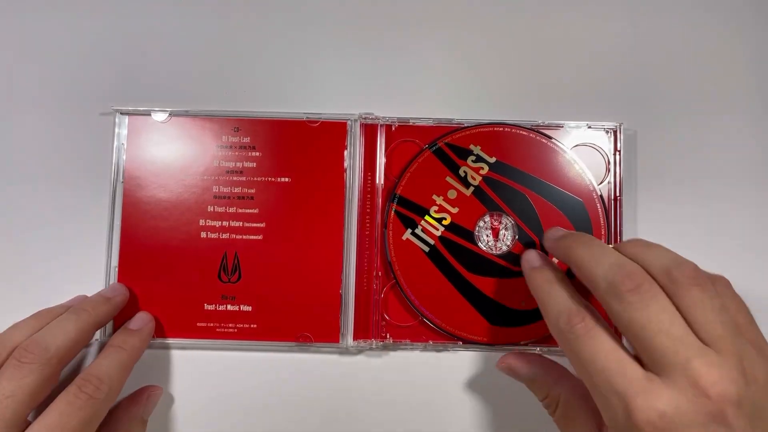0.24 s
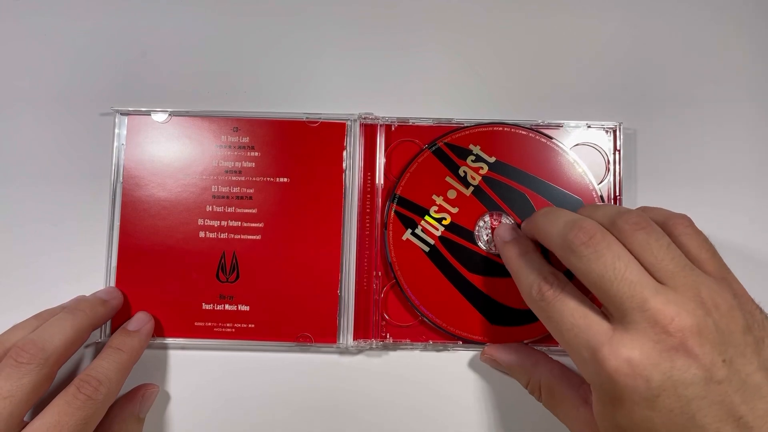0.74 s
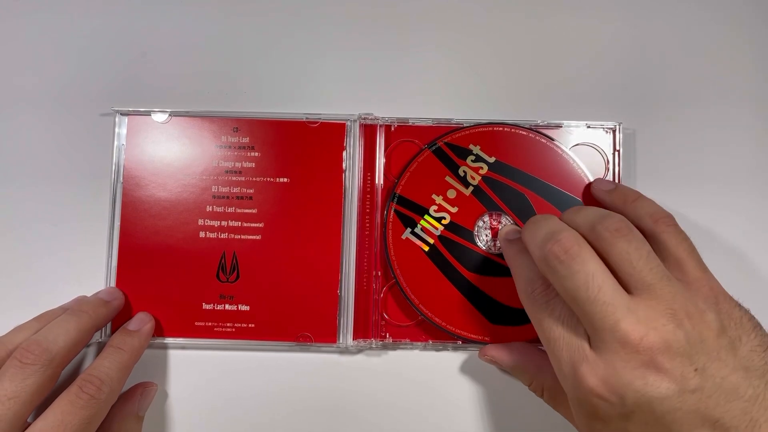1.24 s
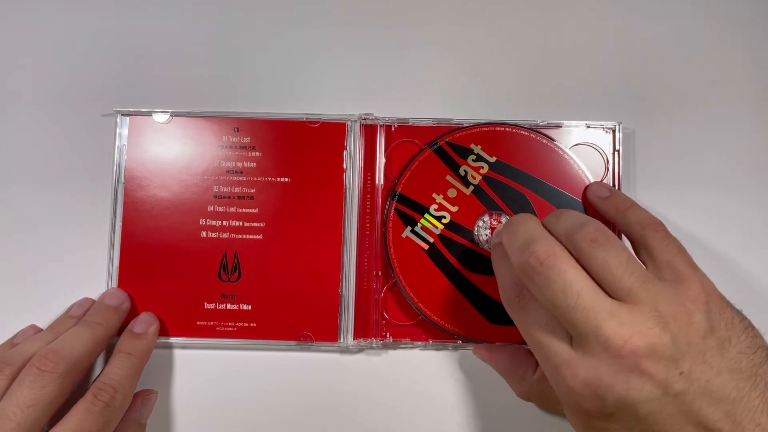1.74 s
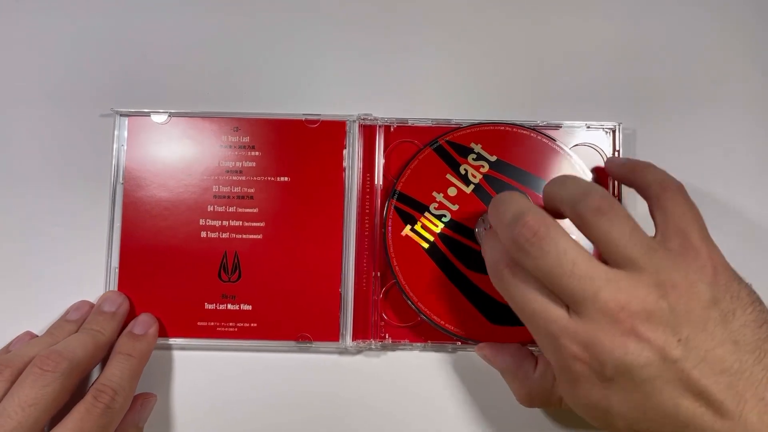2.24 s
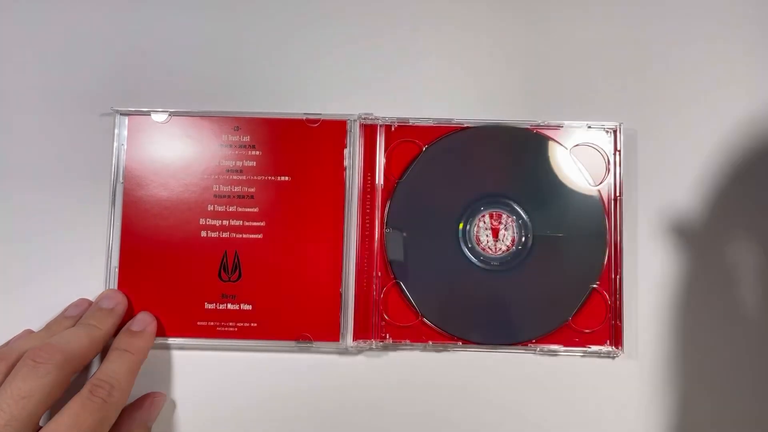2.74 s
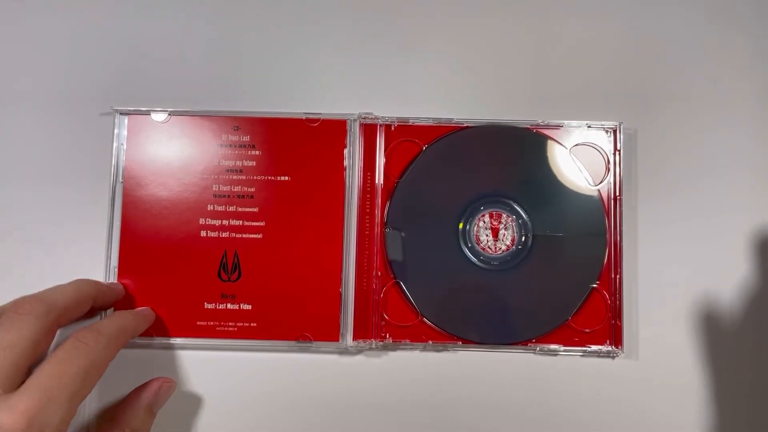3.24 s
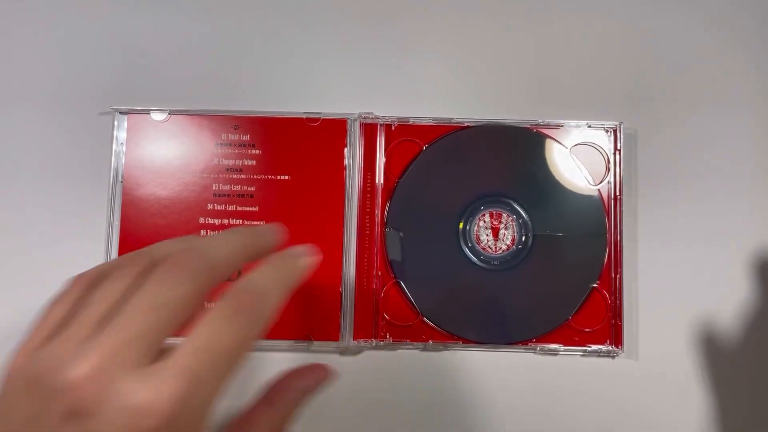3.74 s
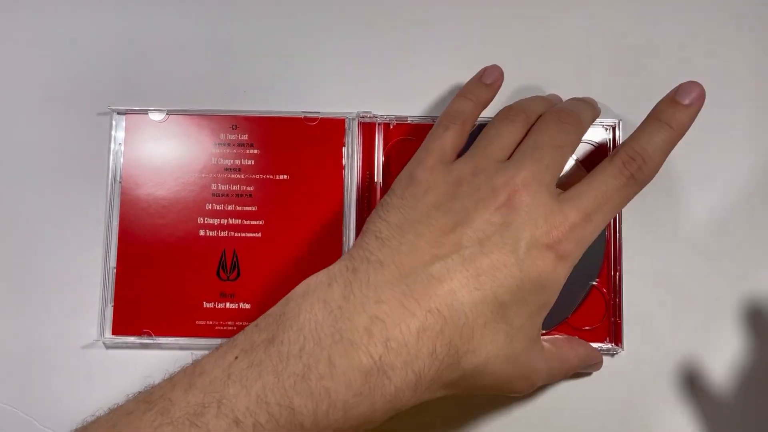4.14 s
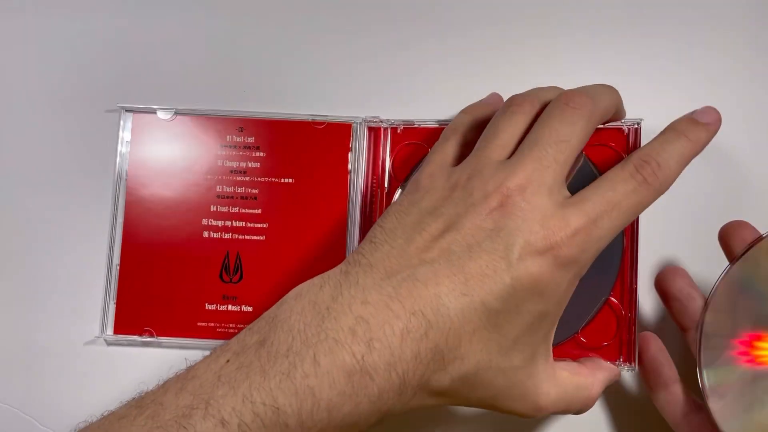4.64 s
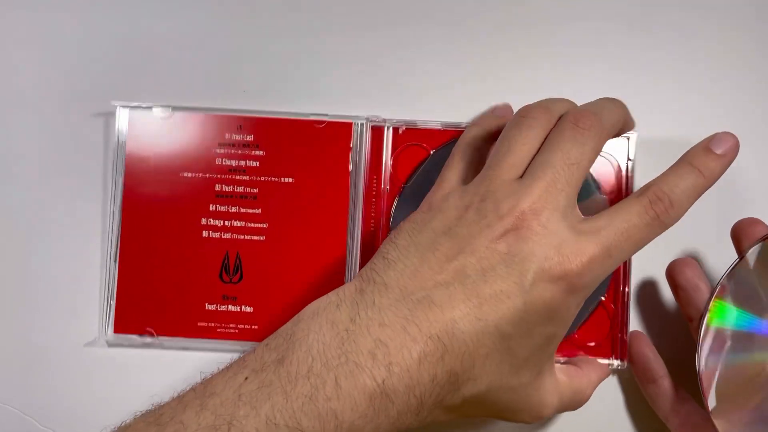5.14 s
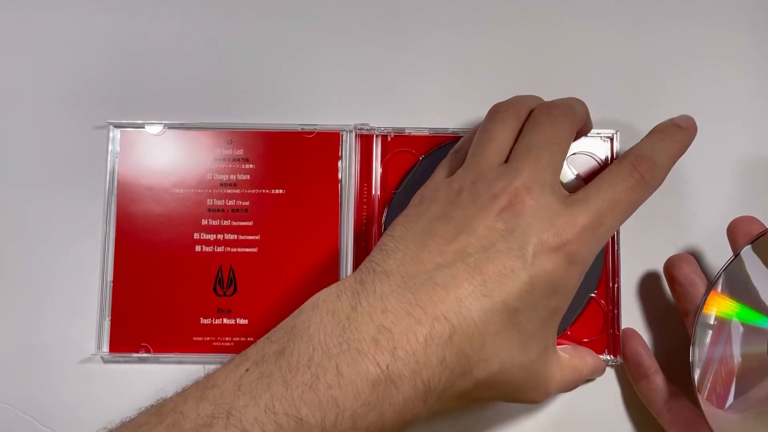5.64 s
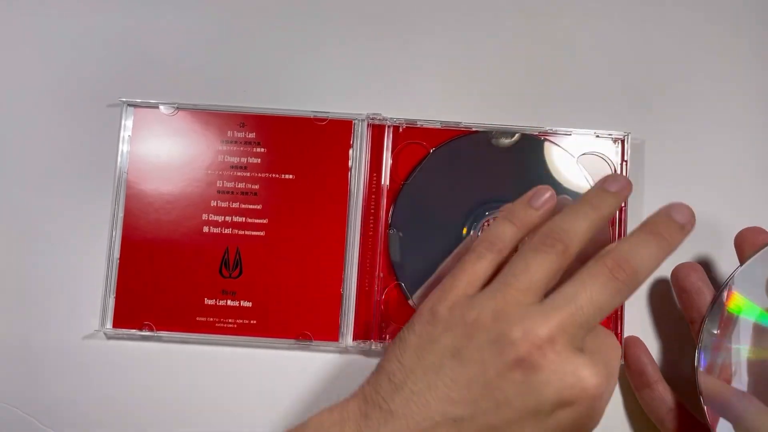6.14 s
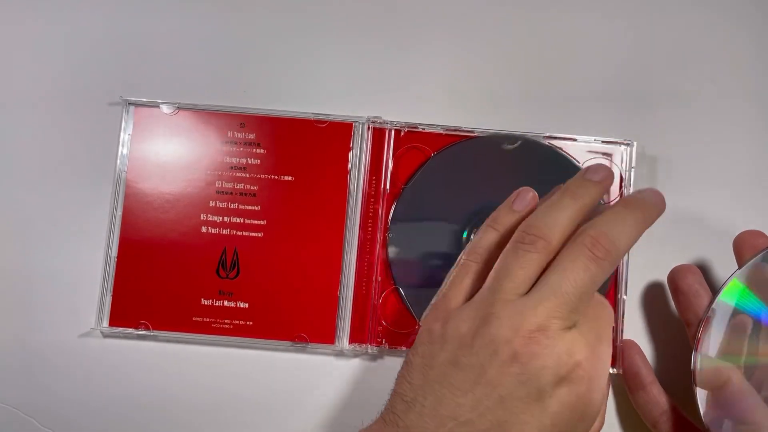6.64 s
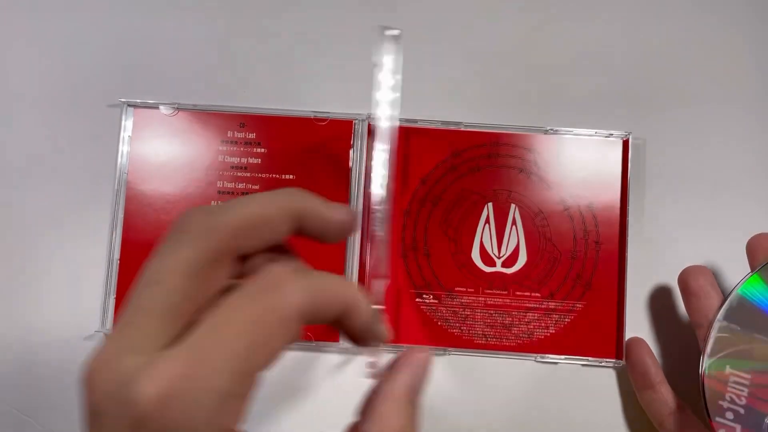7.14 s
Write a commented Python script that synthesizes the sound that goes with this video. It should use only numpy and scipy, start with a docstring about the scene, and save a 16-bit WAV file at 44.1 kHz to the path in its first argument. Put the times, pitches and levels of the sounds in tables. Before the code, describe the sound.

Fingers tick on a plastic disc case, a disc snaps off its hub with a ping, then a tray pries loose with a loud crack.

```python
"""Disc case on a table

A small quiet room, one microphone close to an open plastic disc case lying on a table.
Hands tap, tick, slide and squeak on the plastic: shaped noise bursts through the colour of each spot.
Near 2.1 s a disc snaps off its hub and pings; near 5.2 s the hinged tray is prised loose with a loud crack.
Decaying sines sound case, disc and table; near walls reflect the contacts over room air and a faint fan."""
import sys
import numpy as np
from scipy import signal
from scipy.fft import rfft, irfft
from scipy.io import wavfile
from scipy.ndimage import uniform_filter1d

SR = 44100
rng = np.random.default_rng(int(sys.argv[2]) if len(sys.argv) > 2 else 0)


def unload_audio(sound):
    """Save the sound as a 16-bit wav file, at the path given as the first command line argument."""
    columns = np.transpose(np.atleast_2d(sound))
    # keep every value between -1 and 1, then stretch to whole-number steps
    steps = np.round(np.clip(columns, -1, 1) * 32767)
    wavfile.write(sys.argv[1], SR, steps.astype(np.int16))


N = 325458  # length [samples]

# Contact levels below hold before the colour of the plastic, the spot and the room.
# room air and draughts: (frequency [Hz], density [dB per Hz])
AIR_SPECTRUM = [(1, -41), (5, -45.5), (16, -58), (25, -56), (35, -69.5), (50, -79.5), (100, -84.5),
                (160, -85.5), (220, -92.5), (330, -95.5), (600, -101.5), (1000, -105), (2000, -113),
                (4000, -115), (10000, -116), (13000, -120), (16000, -125)]
# swell of the deep rumble, used relative to its mean: (time [s], level [dB])
RUMBLE_SWELL = [(0.0, -57.5), (0.9, -48.5), (1.17, -60), (1.31, -44), (3.55, -53.5), (3.64, -43),
                (5.14, -51), (5.18, -37.5), (5.88, -52), (6.19, -44.5), (7.36, -47), (7.38, -44.5)]
# a distant fan: (frequency [Hz], level [dB])
FAN_HUM = [(150.7, -66.5), (183, -80), (242, -73)]
# centres of bass, middle, presence and treble: (frequency [Hz])
BANDS_HZ = [330, 1100, 3500, 8500]
# colour common to all contacts: (frequency [Hz], gain [dB])
PLASTIC_COLOUR = [(40, -19), (100, -1.5), (170, -2), (260, -3.5), (380, -4.5), (520, -0.5), (720, -1),
                  (1700, -4.5), (2300, -6), (4000, -1.5), (7000, -3), (8900, -1), (11500, -6), (13000, -12),
                  (15500, -19.5)]
# fingers and plastic sliding:
# (start [s], end [s], level [dB], brightness [dB per octave], favoured by the spot [Hz])
RUBS = [(0, 0.052, -61.5, 5.5, 5240), (0.843, 0.872, -54, -2, 4280), (0.992, 1.045, -58, -1, 4450),
        (1.593, 1.828, -62, -4, 9100), (2.161, 2.18, -46.5, -0.5, 8750), (2.228, 2.34, -49, -4, 734),
        (2.341, 2.378, -55, -2.5, 8700), (3.744, 4, -69, 0, 10020), (4.048, 4.157, -46, -0.9, 7900),
        (4.145, 4.229, -58, -2, 8750), (4.376, 4.484, -50, -2.2, 580), (4.81, 4.89, -60.5, -4, 7970),
        (5.075, 5.121, -53.5, -4.5, 8600), (5.134, 5.177, -31.5, -0.5, 1650), (5.336, 5.391, -52, -3, 8300),
        (5.423, 5.55, -58, -3.5, 9400), (5.694, 5.867, -55, -3, 9300), (5.849, 5.976, -50.5, -2.5, 6060),
        (6.04, 6.082, -54.5, -1.5, 4720), (6.137, 6.207, -46.5, -3, 6500), (6.212, 6.231, -49, -4, 4400),
        (6.245, 6.368, -51.5, -5, 8600), (6.588, 6.644, -49, -5.5, 730), (6.626, 6.665, -38.5, -4, 940),
        (6.658, 6.696, -35.5, -4, 1550), (6.68, 6.907, -57, -1.5, 686), (7.0, 7.254, -71, 0.5, 9750)]
# fingertips feel for a grip: (start [s], end [s])
FIDGETS = [(.1, 2), (1.7, 3.6), (5.7, 6.35)]
# dull knocks of fingertips and tray: (time [s], energy [dB], favoured by the spot [Hz])
KNOCKS = [(.291, -19.5, 640), (.5327, -22.5, 500), (1.6267, -18.5, 1190), (2.0886, 6.5, 1030),
          (3.772, -21.5, 1150), (4.0625, -14, 970), (5.7272, -12, 966), (6.0641, -12.5, 685),
          (6.1625, -9.5, 700), (6.5535, 3, 1415), (6.555, 4.5, 690), (6.61, -5.5, 700),
          (6.7439, -7.5, 1500)]
# a soft fingertip gives little treble: one value per band (gain [dB])
KNOCK_COLOUR = [0, 0.5, -21, -21]
# low booms of the case against the table top: (time [s], frequency [Hz], level [dB])
THUMPS = [(0.859, 117, -43.5), (1.635, 119.2, -45.5), (2.087, 112, -35), (4.067, 118, -45),
          (4.536, 115.3, -43.5), (5.205, 99.5, -22.5), (5.43, 108, -41), (6.362, 113.7, -37),
          (6.641, 134.2, -33), (6.673, 111, -33)]
# the tray springs back as the disc leaves its hub, then as the tray comes loose:
# (time [s], level [dB], loss of the higher modes [dB per octave])
TRAY_RELEASES = [(2.088, -25.5, 5.5), (5.172, -19.5, -1.5)]
# bending modes of the tray: (frequency [Hz], level [dB], t60 [s])
TRAY_BENDING = [(150, -0.5, .18), (181, -0.5, .13), (226.6, 0, 0.1), (335.4, 0, 0.099), (420, -6, .14)]
# plastic catches and lets go: (time [s], energy [dB], brightness [dB per octave],
# rattle against the first crack [dB], favoured by the spot [Hz])
CLICKS = [(1.182, -30, 2.5, 0, 9000), (1.2275, -34.5, 1.5, -6, 8860), (1.3122, -31, -3.5, -5, 7340),
          (1.3642, -31, -4, 1, 3590), (1.598, -23.5, 0, 16.5, 9860), (1.7236, -5.5, -3.5, -8.5, 1940),
          (1.7908, -28, -0.5, -2.5, 7700), (2.0548, -32.5, -1.5, -6.5, 4170), (2.0873, 5.5, -1.5, 0, 4000),
          (2.0881, 9, -1.76, -6.5, 2720), (2.2543, -20.5, -3, 7, 599), (2.3727, -26, -3, -5.5, 8550),
          (3.134, -31, -3, 6, 3470), (3.4395, -26.5, -0.5, -15, 10300), (3.524, -34.5, -3.5, 4, 3570),
          (4.0247, -22, -3, -2, 4900), (4.15, -16, -2, 15, 920), (4.2308, -25, 1.8, -5, 4150),
          (4.3244, -21.5, -2.5, -4, 577), (4.368, -29.5, -1.5, -4, 4470), (4.5292, -16.5, -6, -7, 3600),
          (4.5381, -9.5, -6.5, 2, 2310), (4.9454, -12, 0.1, 0, 9000), (5.041, -22, -0.6, 1, 3380),
          (5.1386, -9.5, -2.5, 6.5, 1550), (5.1481, -5.5, 2, 5.5, 8750), (5.1547, -3.5, 0.5, 0.5, 4470),
          (5.1714, 18, -0.45, -5, 1720), (5.174, 11.5, -1, 4, 3860), (5.1767, 5.5, 0, 2.5, 10500),
          (5.1845, 8.5, -0.5, 3, 9300), (5.3751, -15.5, -3, 4, 8100), (5.6455, -19, -3.5, 8.5, 1160),
          (6.0643, -21.5, -5.5, -7, 4000), (6.3639, -7.5, -3.5, 2.5, 9900), (6.482, -30, -1, 0, 5370),
          (6.551, -2, -2.5, 8, 5320), (6.6321, -8, -0.5, 13, 5100), (6.677, -10, -1, 15, 9500),
          (6.8662, -23.5, -2, 5, 10200)]
# skin squeaks faintly on the disc: (start [s], end [s], level [dB])
SQUEAKS = [(1.196, 1.204, -52), (2.41, 2.522, -62.5), (2.84, 2.9, -70), (2.995, 3.08, -68),
           (3.217, 3.262, -61)]
# colour of a squeak: one value per band (gain [dB])
SQUEAK_COLOUR = [-12, -18, -1.5, -8.5]
# the disc is flexed and let go: (time [s], level [dB])
DISC_FLEXES = [(2.086, -31.5), (3.441, -66), (4.946, -48), (5.04, -53)]
# modes of the disc: (frequency [Hz], level [dB], t60 before the cap in ring() [s])
DISC_MODES = [(983, -5, 0.24), (1200, -7.5, .09), (2050, -4.5, 0.071), (2726, -6.5, .08), (3250, 0, 0.057),
              (3340, -0.5, .08)]
# modes of case and tray: (frequency [Hz], relative level [dB], t60 before the cap in ring() [s])
CASE_MODES = [(341.3, 4, 0.11), (484, 0, 0.073), (672, -2, 0.15), (928, 0, .08), (1065, -7, 0.055),
              (1333.5, -4, .08), (1640, 3, .07), (2320, -8.5, 0.1), (3850, -1, 0.027), (4350, -5, 0.024),
              (8190, -3.5, 0.094), (8590, 1.5, 0.073)]
# decay of the reflections: (frequency [Hz], t60 [s])
ROOM_DECAY = [(100, 0.97), (260, 0.15), (700, 0.18), (1840, 0.16), (4850, 0.12), (10500, 0.1),
              (13500, 0.19)]


def amp(db):
    """Decibels to gain."""
    return 10 ** (np.asarray(db) / 20)


def evened(x):
    """Scales to rms 1."""
    return x / np.sqrt(np.mean(x ** 2) + 1e-20)


def unit(x):
    """Scales to energy 1."""
    return x / np.linalg.norm(x)


def read(points, hz):
    """Joins (frequency [Hz], value) points on a log-frequency axis."""
    f, value = np.transpose(points)
    return np.interp(np.log(hz + 1), np.log(f + 1), value)


def add(mix, s, sound):
    """Mixes a sound in at time s."""
    part = mix[max(round(s * SR), 0):][:len(sound)]
    part += sound[:len(part)]


def wander(count, per_s):
    """Random levels, per_s of them each second, joined by straight lines."""
    at = np.arange(count) * per_s / SR
    return np.interp(at, np.arange(4096), rng.standard_normal(4096))


def noise(points):
    """Steady noise with a given spectrum in dB per Hz."""
    spectrum = rfft(rng.standard_normal(N))
    gain = amp(read(points, np.fft.rfftfreq(N, 1 / SR)))
    return np.sqrt(SR / 2) * irfft(spectrum * gain, N)


def background(waver=0.55, follow=0.87, rumble_hz=70):
    """Room air whose deep rumble swells and sinks, with a fan hum of wavering phase (waver [rad])."""
    t = np.arange(N) / SR
    hum = np.zeros(N)
    for hz, db in FAN_HUM:
        phase = 2 * np.pi * hz * t + waver * wander(N, per_s=12)
        hum += amp(db) * evened(np.sin(phase))
    air = noise(AIR_SPECTRUM)
    rumble = signal.sosfiltfilt(signal.butter(2, rumble_hz, fs=SR, output="sos"), air)
    swell_db = np.interp(t, *np.transpose(RUMBLE_SWELL))
    swell = amp(follow * (swell_db - swell_db.mean()))
    return air + rumble * (swell - 1) + hum


def contact(band_db, spot_hz, spot_db=7, spot_width=0.11, dulling=0.61, gentle_db=-15, size=2048):
    """The causal pulse of one contact; the spot touched favours one broad resonance."""
    hz = np.fft.rfftfreq(size, 1 / SR)
    spot_bump_db = spot_db / (1 + ((hz / spot_hz - 1) / spot_width) ** 2)
    # contacts with strong treble are made duller above 11.5 kHz
    excess_db = max(band_db[-1] - gentle_db, 0)
    top_db = -dulling * excess_db * np.clip((hz - 11500) / 3000, 0, 1)
    bands_db = read(list(zip(BANDS_HZ, band_db)), hz)
    log_gain = np.log(amp(bands_db + read(PLASTIC_COLOUR, hz) + spot_bump_db + top_db))
    # minimum phase: the energy comes as early as this spectrum allows
    circle = np.concatenate([log_gain, log_gain[-2:0:-1]])
    return np.fft.ifft(np.exp(np.conj(signal.hilbert(circle)))).real


def tilted(db, brightness, shape_db, pivot_hz=2500):
    """Band levels of a contact, tilted about a pivot by its brightness in dB per octave."""
    return db + brightness * np.log2(np.divide(BANDS_HZ, pivot_hz)) + np.array(shape_db)


def friction(slips_per_s=1000, spread_db=4, smooth_db=-2, uneven_db=2.5):
    """Sliding is a swarm of tiny slips over a smooth hiss, under uneven finger pressure."""
    sizes = amp(spread_db * np.minimum(rng.exponential(1, N), 3))
    signed_sizes = sizes * rng.choice([-1, 1], N)
    slips = evened(signed_sizes * (rng.random(N) < slips_per_s / SR))
    hiss = amp(smooth_db) * rng.standard_normal(N)
    pressure = amp(uneven_db * wander(N, per_s=200))
    return (slips + hiss) * pressure


def stroke(slips, start, end, edge=0.59):
    """One slide swells and fades; edge is the share of its length spent doing so."""
    part = slips[max(round(start * SR), 0):round(end * SR)]
    return evened(part * signal.windows.tukey(len(part), edge))


def rubs(shape_db=(-2, -3.8, -4.8, -2.8)):
    """Fingers slide over the case and plastic over plastic: friction noise coloured by the spot."""
    slips, out = friction(), np.zeros(N)
    for start, end, db, brightness, spot_hz in RUBS:
        pulse = contact(tilted(db, brightness, shape_db), spot_hz, spot_db=6.5, spot_width=.25)
        add(out, start, signal.fftconvolve(stroke(slips, start, end), pulse))
    return out


def rattle(t60, count=4096):
    """The shell chatters in a decaying noise burst, near equal in strength at all pitches."""
    fade = amp(-60 * np.arange(count) / SR / t60)
    chatter = rng.standard_normal(count) * fade
    for _ in range(4):  # flatten the spectrum, then restore the decay
        z = rfft(chatter)
        chatter = irfft(z / (abs(z) + 1e-12))
        chatter *= fade / np.sqrt(abs(uniform_filter1d(chatter ** 2, 64)) + 1e-12)
    return unit(chatter)


def fidgets(band_db=(-39, -44, -42, -40), spread_db=4, count=14):
    """Skin sticks and lets go on the plastic in faint random ticks, each of its own colour."""
    out = np.zeros(N)
    for start, end in FIDGETS:
        for when, spot, *colour in rng.random((count, 6)):
            tick_db = np.add(band_db, spread_db * (2 * np.array(colour) - 1))
            tick = contact(tick_db, spot_hz=3000 + 8000 * spot)
            add(out, start + when * (end - start), np.convolve(rattle(t60=0.039), tick))
    return out


def blow(rattle_db, crack_t60, rattle_t60, lag_s=.0008, chatter_db=2.0):
    """One sharp crack followed by the short, uneven rattle of the shell."""
    out, shell = rattle(crack_t60), rattle(rattle_t60)
    uneven = unit(shell * amp(chatter_db * wander(len(shell), per_s=700)))
    add(out, lag_s, amp(rattle_db) * uneven)
    return unit(out)


def knocks(rattle_db=1.5):
    """A padded blow sounds the low resonance of the spot that it lands on."""
    out = np.zeros(N)
    for s, db, spot_hz in KNOCKS:
        hit = blow(rattle_db, crack_t60=0.0084, rattle_t60=0.045)
        add(out, s, signal.fftconvolve(hit, contact(np.add(KNOCK_COLOUR, db), spot_hz)))
    return out


def boom(hz, db, t60, rise_s=.005):
    """One low mode swells and dies."""
    t = np.arange(SR // 2) / SR
    return amp(db - 60 * t / t60) * (1 - np.exp(-t / rise_s)) * np.sin(2 * np.pi * hz * t)


def table(t60=.33):
    """The table top booms briefly when the case is pressed against it or the tray springs back."""
    out = np.zeros(N)
    for s, hz, db in THUMPS:
        add(out, s, boom(hz, db, t60))
    lowest_hz = TRAY_BENDING[0][0]
    for s, db, loss_db in TRAY_RELEASES:
        for hz, mode_db, mode_t60 in TRAY_BENDING:
            level_db = db + mode_db - loss_db * np.log2(hz / lowest_hz)
            add(out, s, boom(hz, level_db, mode_t60))
    return out


def clicks(shape_db=(-1.3, -.8, -.4, -2)):
    """Hard plastic lets go with a crack, coloured by the spot where it happens."""
    out = np.zeros(N)
    for s, db, brightness, rattle_db, spot_hz in CLICKS:
        pulse = contact(tilted(db, brightness, shape_db), spot_hz, spot_db=8, spot_width=.14)
        hit = blow(rattle_db, crack_t60=0.0072, rattle_t60=.034)
        add(out, s, signal.fftconvolve(hit, pulse))
    return out


def squeaks(squeak_hz=3700):
    """Skin dragged over the disc sings in one narrow band of friction noise."""
    slips, out = friction(), np.zeros(N)
    for start, end, db in SQUEAKS:
        pulse = contact(np.add(SQUEAK_COLOUR, db), squeak_hz, spot_db=9.5, spot_width=0.084)
        add(out, start, signal.fftconvolve(stroke(slips, start, end), pulse))
    return out


def ring(modes, longest_t60=.14):
    """A set of modes struck once; plastic damps them all, so no t60 passes the longest [s]."""
    t = np.arange(SR // 3) / SR
    out = np.zeros(len(t))
    for hz, db, t60 in modes:
        fade = amp(db - 60 * t / min(t60, longest_t60))
        out += fade * np.sin(2 * np.pi * (hz * t + rng.random()))
    return out


def disc():
    """The disc pings in its own modes as it springs back."""
    out = np.zeros(N)
    for s, db in DISC_FLEXES:
        add(out, s, amp(db) * ring(DISC_MODES))
    return out


def case(x):
    """The lasting modes of case and tray answer every contact, 18 dB down."""
    return x + amp(-18) * signal.fftconvolve(x, unit(ring(CASE_MODES)))[:N]


def room(x, wet_db=-8, build_s=0.0064):
    """Dense reflections from near walls, each band dying at its own speed."""
    t = np.arange(SR // 2) / SR
    taps = rng.choice([-1., 1.], len(t)) * (1 - np.exp(-(t / build_s) ** 2))
    hz, when, z = signal.stft(taps, SR, nperseg=256)
    decay = amp(-60 * when / read(ROOM_DECAY, hz)[:, None])
    tail = signal.istft(z * decay, SR, nperseg=256)[1]
    return x + amp(wet_db) * signal.fftconvolve(x, unit(tail))[:N]


def scene():
    """Contacts ring the case; they and the disc ring the room, over table booms and background."""
    contacts = clicks() + knocks() + rubs() + squeaks() + fidgets()
    in_room = room(case(contacts) + disc())
    return (in_room + table() + background())[None]


def record(dry, edge_hz=15950):
    """The microphone channel clips peaks at 0.9 of full scale, then cuts all above the band edge."""
    low_pass = signal.firwin(511, edge_hz, window=("kaiser", 9), fs=SR)
    return signal.oaconvolve(np.clip(dry, -.9, .9), low_pass[None], "same")


dry = scene()
out = record(dry)
unload_audio(out)
```